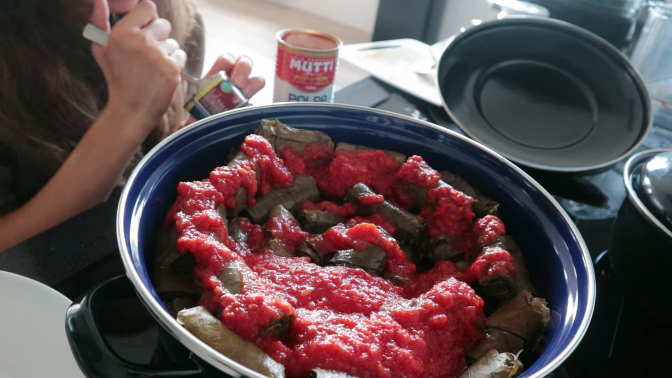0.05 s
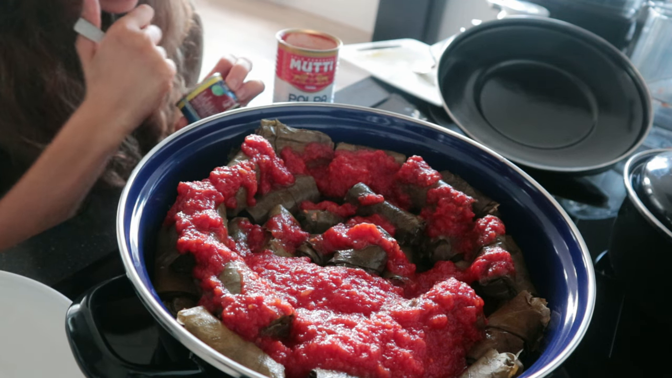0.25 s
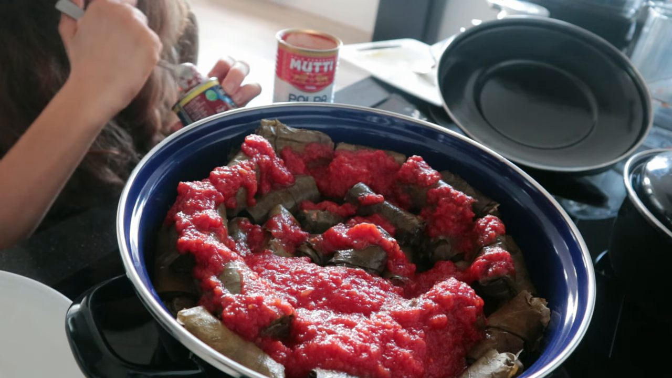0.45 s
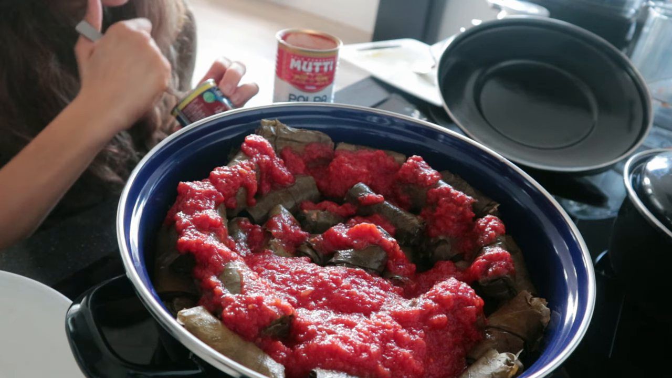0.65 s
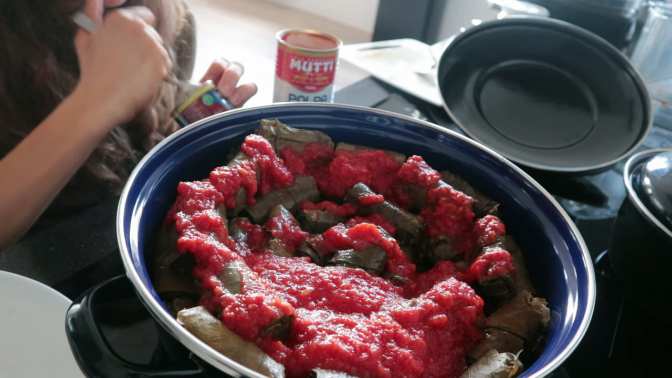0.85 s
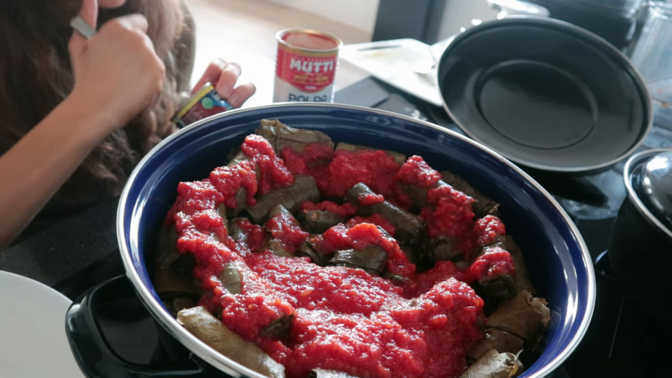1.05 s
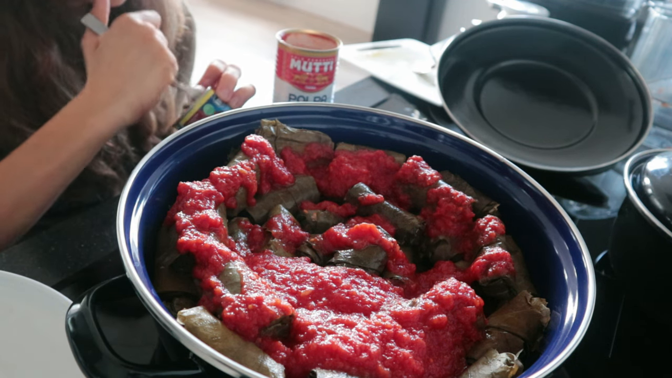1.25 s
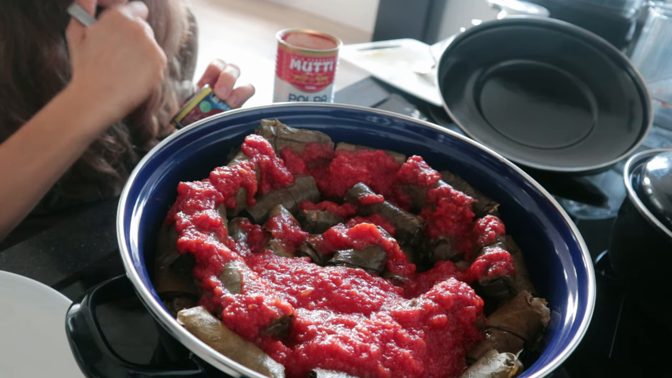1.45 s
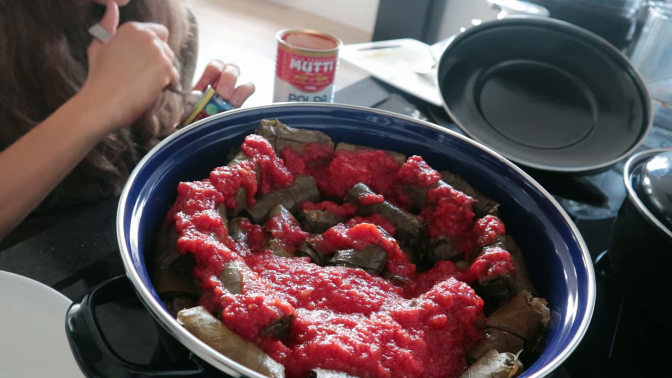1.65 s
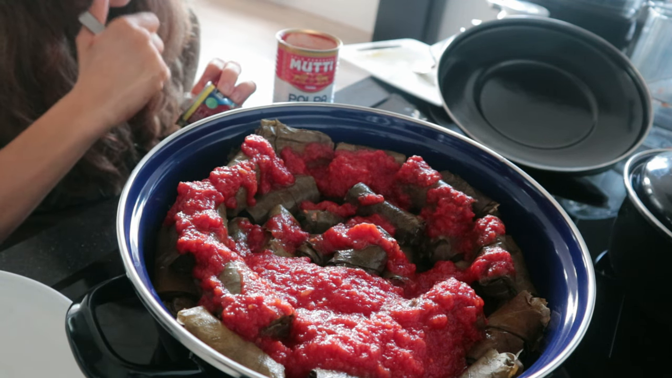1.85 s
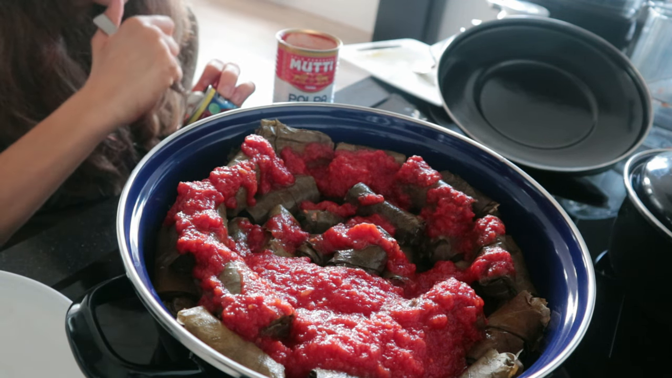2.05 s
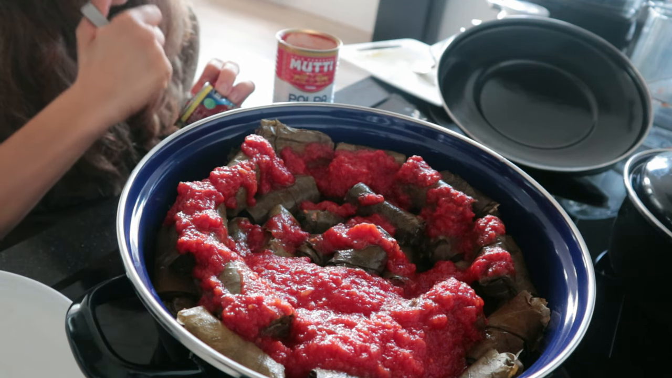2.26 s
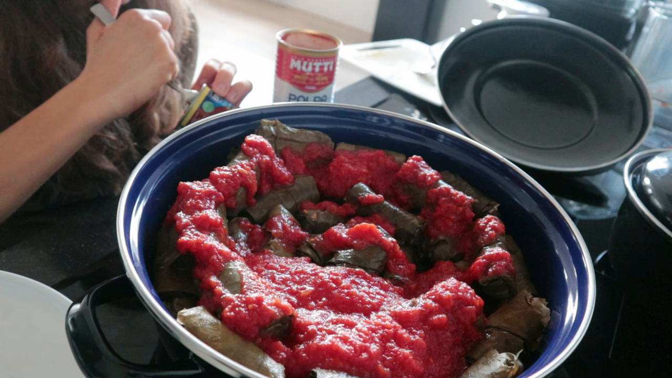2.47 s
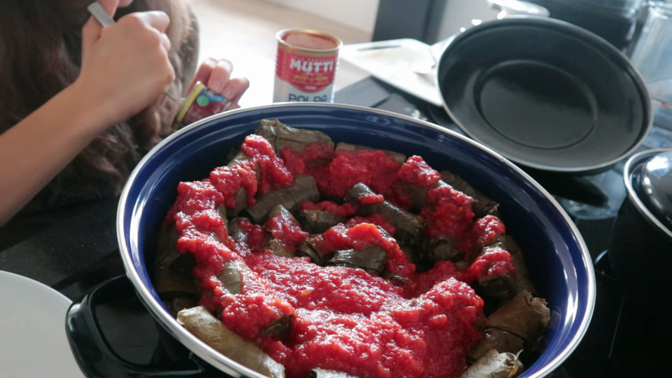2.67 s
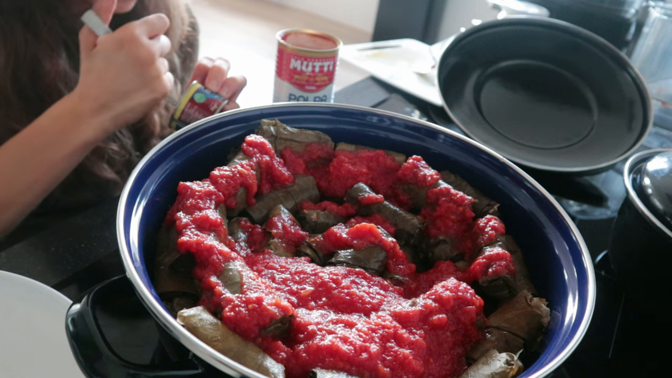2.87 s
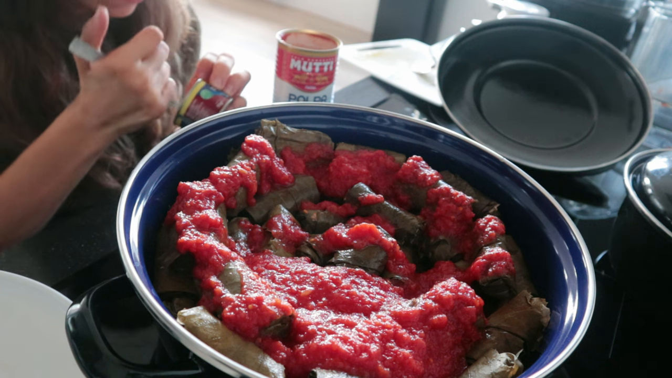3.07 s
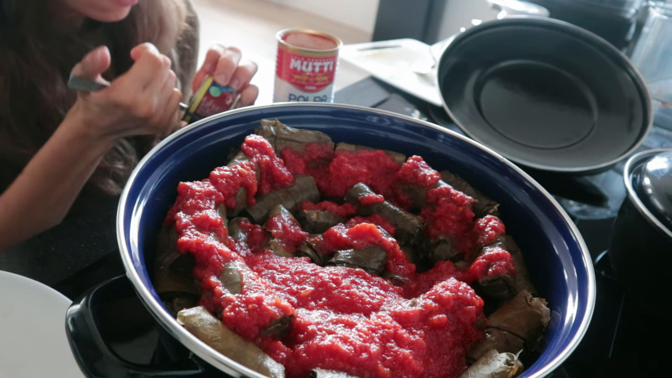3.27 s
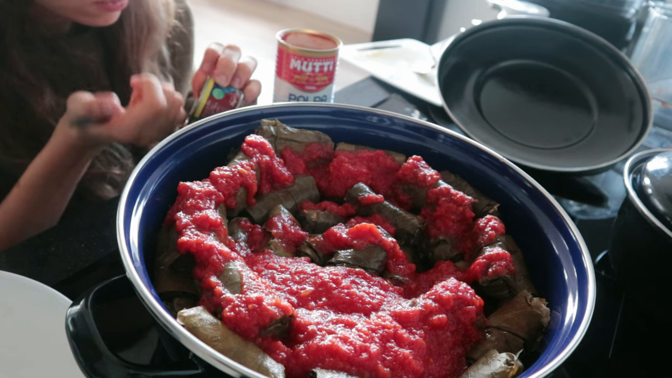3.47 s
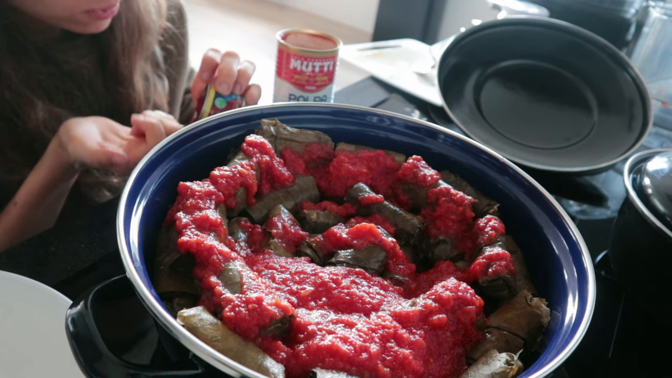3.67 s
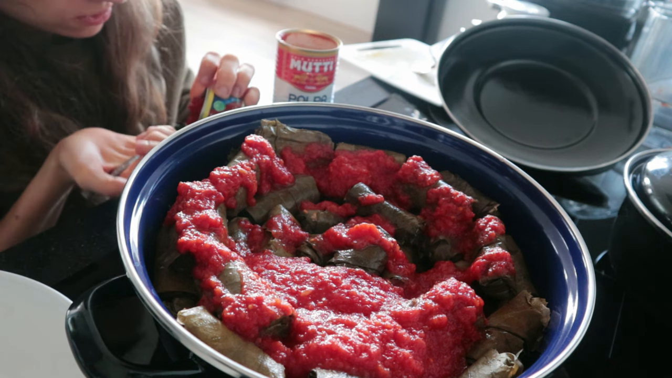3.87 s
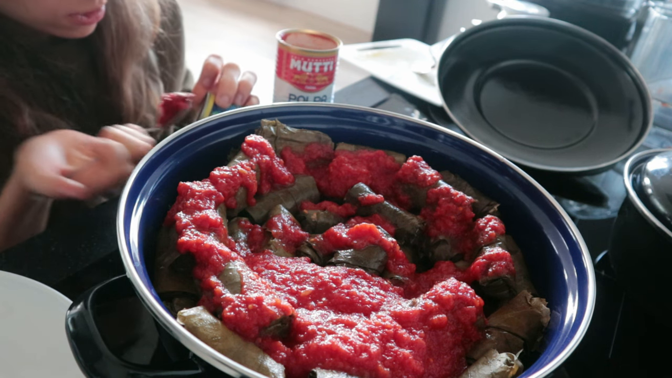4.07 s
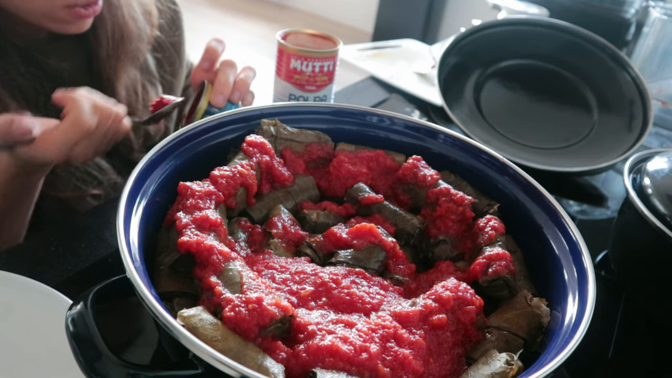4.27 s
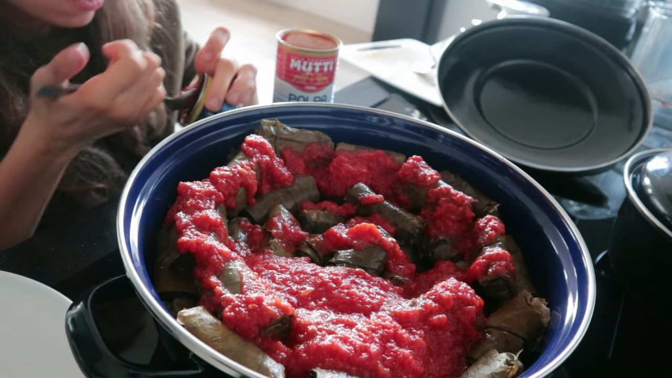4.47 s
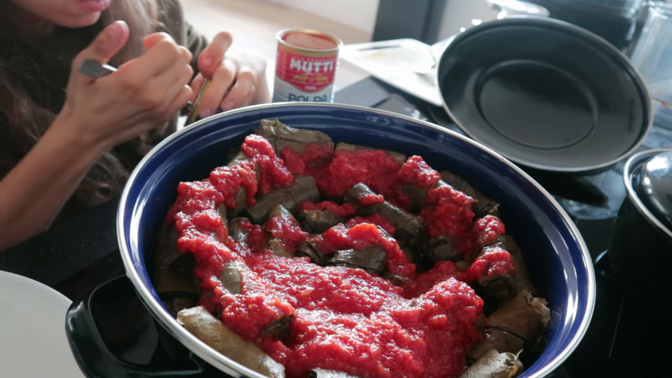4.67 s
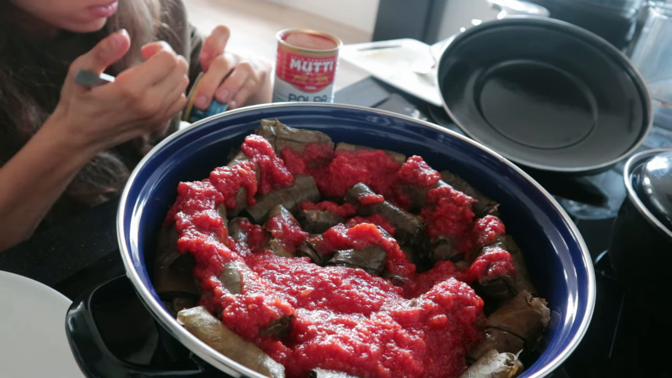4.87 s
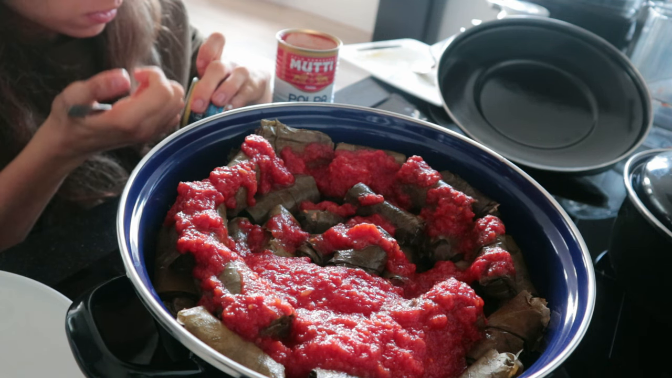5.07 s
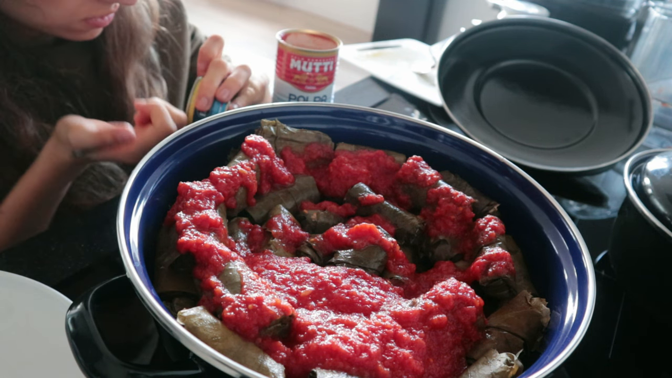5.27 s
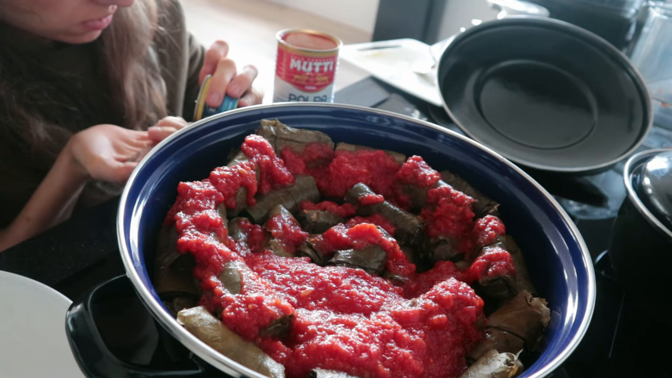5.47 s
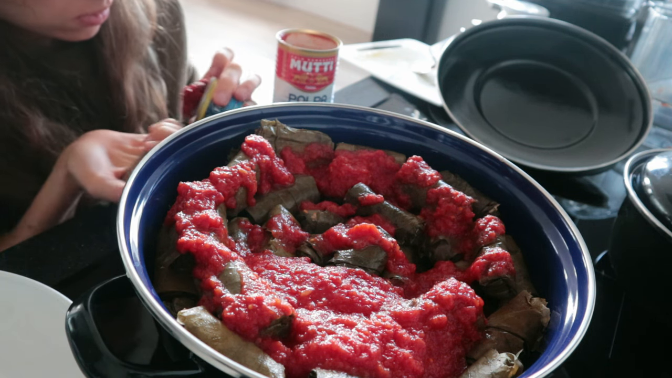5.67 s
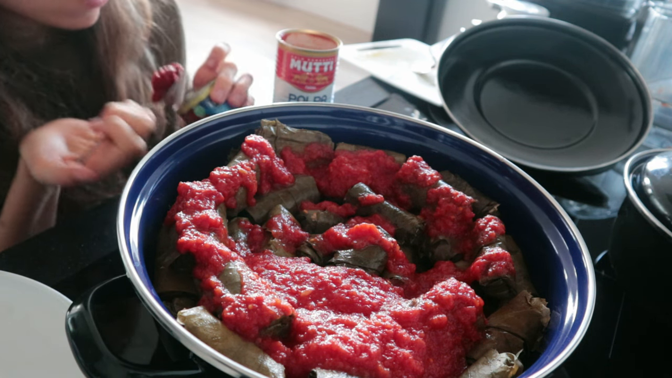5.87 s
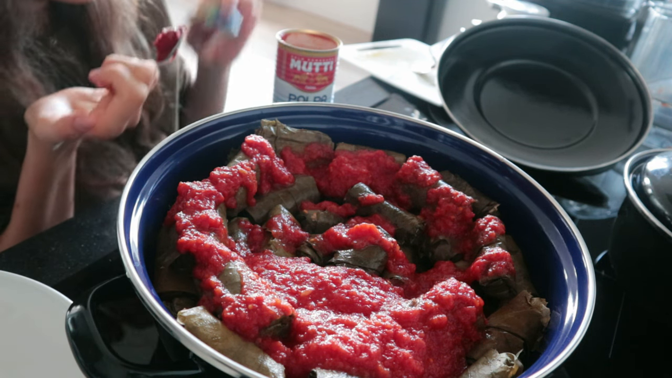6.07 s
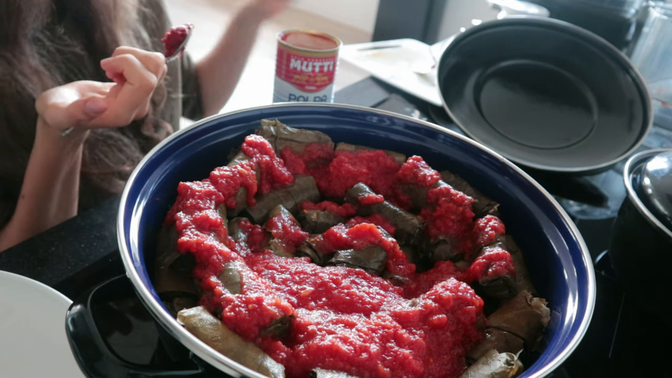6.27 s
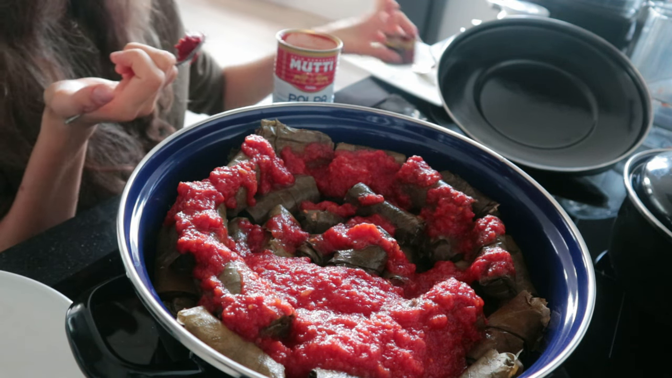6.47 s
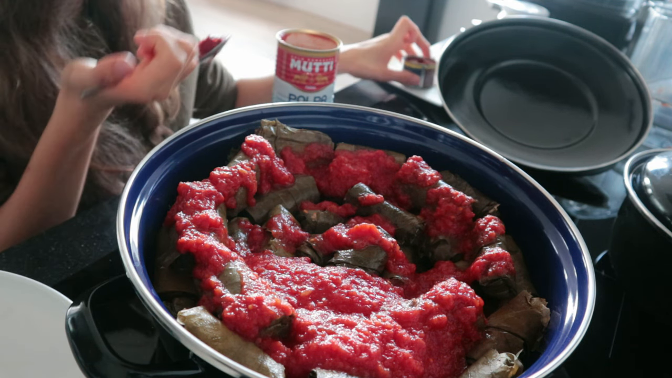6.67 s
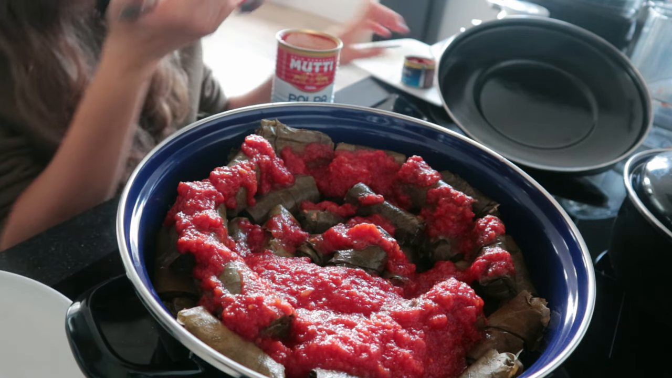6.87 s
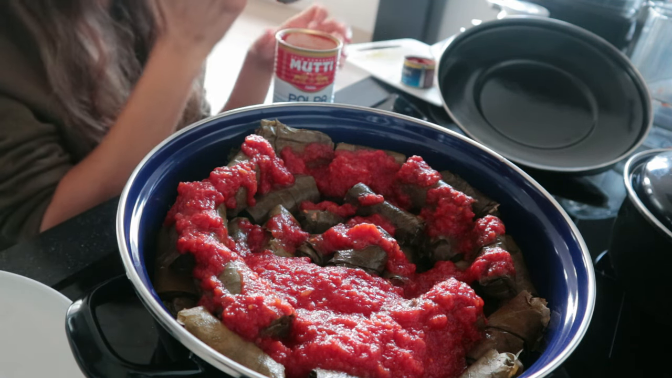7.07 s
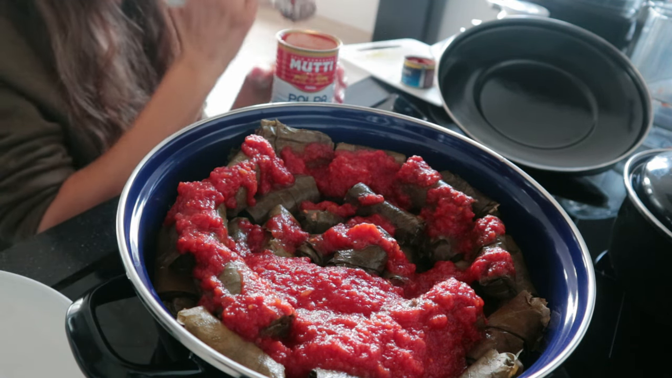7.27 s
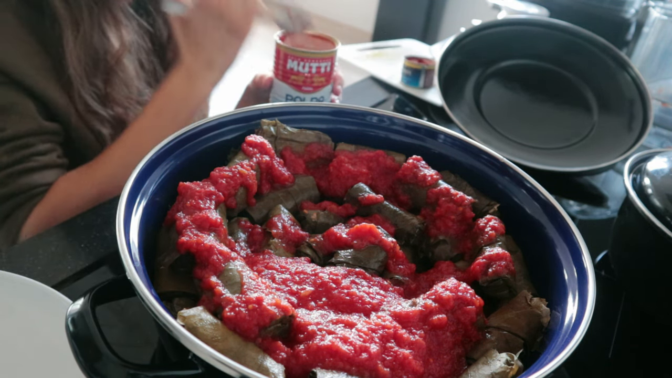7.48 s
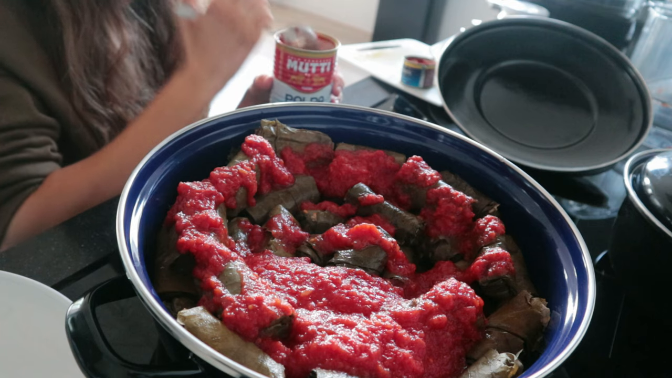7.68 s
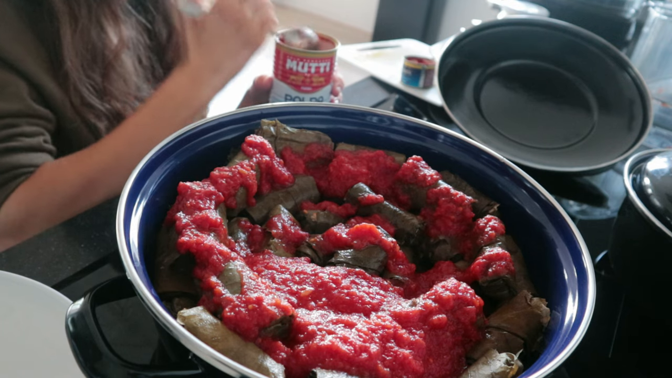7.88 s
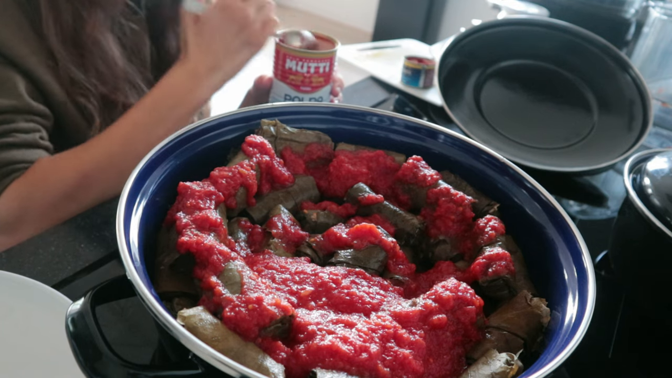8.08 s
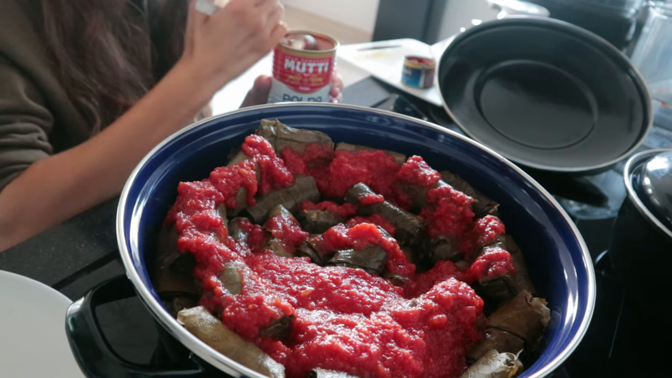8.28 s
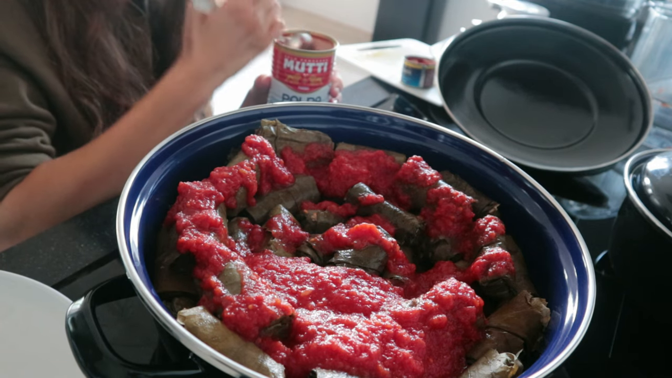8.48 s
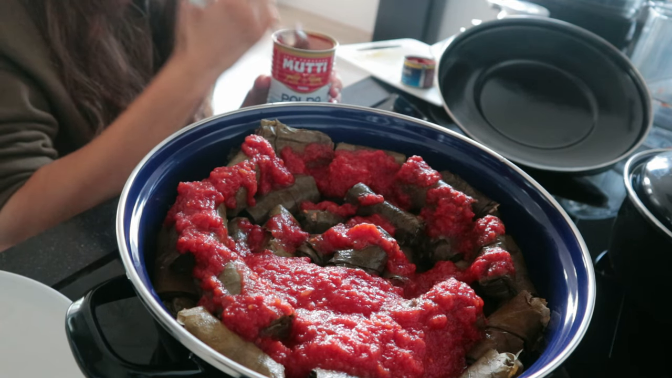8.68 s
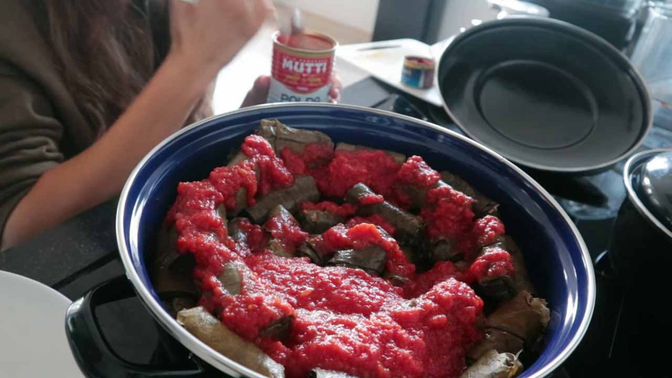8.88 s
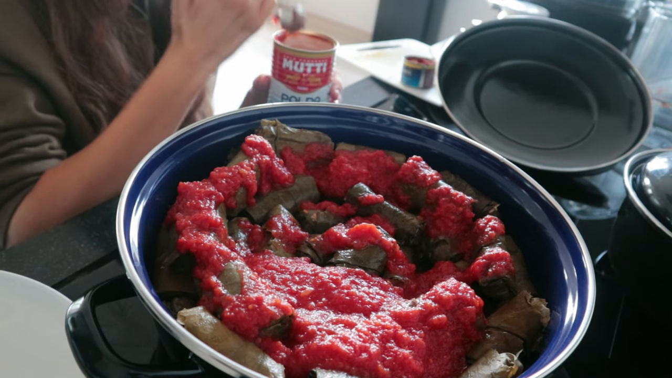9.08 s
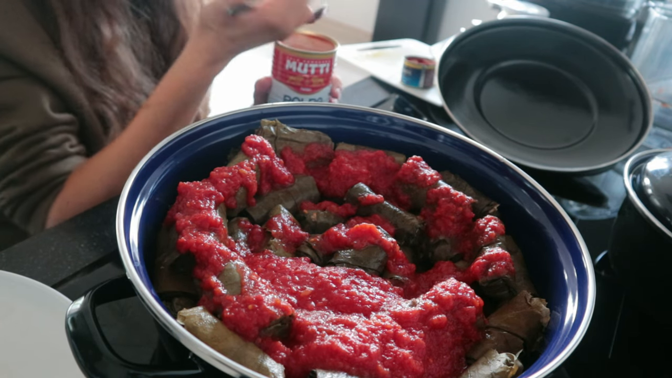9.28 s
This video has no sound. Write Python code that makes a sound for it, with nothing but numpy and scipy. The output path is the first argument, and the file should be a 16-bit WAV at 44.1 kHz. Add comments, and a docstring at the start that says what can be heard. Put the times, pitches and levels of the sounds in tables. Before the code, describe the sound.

In a quiet, humming kitchen, light spoon ticks and scrapes in a little tin lead to one broad clack and ten ringing knocks on a can.

```python
"""A steel spoon taps and scrapes inside a small tin of paste: brief contacts ring the tin's modes,
jerky friction noise rubs them. The whole base of the tin lands on the counter in one broad clack.
Then the spoon is knocked clean on the rim of a larger can, which rings, rocks, thuds and wobbles.
Dense echoes from hard walls surround the blows; the quiet kitchen is resonant hum, air noise and hiss."""
import sys
import numpy as np
from scipy import signal
from scipy.fft import rfft, irfft, next_fast_len
from scipy.io import wavfile

SR = 44100
rng = np.random.default_rng(int(sys.argv[2]) if len(sys.argv) > 2 else 0)


def store_wav(level_fs):
    """Save 16-bit WAV to argv[1]."""
    pcm = np.round(np.clip(np.atleast_2d(level_fs), -1, 1) * 32767)
    wavfile.write(sys.argv[1], SR, pcm.T.astype(np.int16))


N = 411453

# modes of the small tin: (frequency [Hz], relative level [dB], ring time t60 [s])
TIN_MODES = [(675, 5, 0.026), (727, 1.5, 0.065), (788, 7.5, 0.025), (866, 3.5, 0.037), (901, 4.5, 0.027),
             (1228, 0, 0.033), (1306, 0, 0.043), (1381, 5.5, 0.03), (1530, 3, 0.035), (1643, 9, 0.021),
             (1800, 6, 0.026), (1978, 7.5, 0.033), (2075, 4, 0.025), (2202, 3, 0.045), (2317, -5, 0.026),
             (2517, 2.5, 0.025), (2690, 1.5, 0.025), (3035, 8, 0.013), (3328, 5.5, 0.031), (3540, 9, 0.019),
             (3910, 4.5, 0.019), (4230, 5.5, 0.016), (4785, 7.5, 0.013), (5320, 6, 0.02),
             (6210, 1.5, 0.015), (7000, 0, 0.0072), (8560, 8, 0.0086)]
LOW_HZ, TICK_HZ = 1050, 5000  # the tin's boom lies below, its tick and grit above
SHORT = 4096  # samples in a brief burst
BEND, BEND_S = 0.019, 0.022  # modes slide as the wall relaxes: largest share of pitch, time constant


def gain_of(db):
    """Decibels to an amplitude factor."""
    return 10 ** (np.asarray(db) / 20)


def evened(x):
    """Scales to rms 1."""
    return x / np.sqrt(np.mean(x ** 2) + 1e-20)


def read(points, hz):
    """Reads a curve of (frequency, value) points on a log-frequency axis."""
    f, value = np.transpose(points)
    return np.interp(np.log(hz + 1), np.log(f + 1), value)


def add(mix, s, sound):
    """Mixes a sound in at s seconds."""
    part = mix[..., max(round(s * SR), 0):][..., :sound.shape[-1]]
    part += sound[..., :part.shape[-1]]


def coloured(points, size=N):
    """Steady noise of rms 1 with a given spectrum."""
    fast = next_fast_len(size, True)
    colour = gain_of(read(points, np.fft.rfftfreq(fast, 1 / SR)))
    spectrum = rfft(rng.standard_normal(fast)) * colour
    return evened(irfft(spectrum, fast)[:size])


def resonate(x, hz, width):
    """A one-pole complex resonance, width in Hz, with a gain near 1 at its centre."""
    r = np.exp(-np.pi * width / SR)
    return 2 * signal.lfilter([1 - r], [1, -r * np.exp(2j * np.pi * hz / SR)], x).real


def strike(modes, weight_db, contact_ms, chance=1., bend=0.):
    """Modes swell with the contact and die away, varying more with more chance; peak 1."""
    hz, db, t60 = np.transpose(modes)[:, :, None]
    t = np.arange(SHORT) / SR
    luck_db = 2.5 * chance * rng.standard_normal(hz.shape)
    phase = rng.random(hz.shape)
    # pitch bends mostly upwards; this is its integral over time
    slide = bend * rng.uniform(-0.44, 1, hz.shape) * (t - BEND_S * (1 - np.exp(-t / BEND_S)))
    db = db + np.reshape(weight_db, (-1, 1)) + luck_db
    decay = gain_of(db - 60 * t / t60)
    ring = (decay * np.sin(2 * np.pi * (hz * (t + slide) + phase))).sum(0)
    swell = 1 - np.exp(-t * 1000 / max(contact_ms, .05))
    fade_out = np.minimum((SHORT / SR - t) / .03, 1)
    sound = ring * swell * fade_out
    return sound / abs(sound).max()


def burst(points, envelope):
    """A short noise under an envelope, held to a smooth colour, as strong in rms as the envelope."""
    noise = rng.standard_normal(SHORT) * envelope
    colour = gain_of(read(points, np.fft.rfftfreq(SHORT, 1 / SR)))
    gate = np.minimum(envelope / (.1 * envelope.max()), 1)
    for _ in range(3):  # alternately impose the colour and the shape in time
        z = rfft(noise)
        noise = irfft(z / (abs(z) + 1e-12) * colour, SHORT) * gate
    return evened(noise) * np.sqrt(np.mean(envelope ** 2))


def placed(sound, pan_db, lead):
    """Mid and side: pan_db is left over right, and the left is earlier by 2 x lead samples."""
    side = np.tanh(pan_db * np.log(10) / 40) * sound + lead * np.gradient(sound)
    return np.array([sound, side])


def kitchen():
    """Appliance rumble lifted by room resonances, over air noise and a wide microphone hiss."""
    # room resonances: (frequency [Hz], width [Hz], level [dB])
    hum_bands = [(75.1, 12.5, -57), (94, 6, -52.5), (163.4, 6.8, -53.5), (220.2, 18.6, -65.5),
                 (260, 18, -68), (415.5, 11, -71.5)]
    # air noise in the middle: (frequency [Hz], relative density [dB per Hz])
    air_colour = [(12, -52), (20, -18), (37, -9), (81, 1.5), (127, -7), (168, -0.5), (210, -12),
                  (357, -18.5), (410, -20.5), (513, -20.5), (1660, -25.5), (7730, -39.5), (11800, -48.5),
                  (13200, -74), (16000, -80)]
    # hiss in the side channel: (frequency [Hz], relative density [dB per Hz])
    hiss_colour = [(12, -60), (20, -34), (158, -7.5), (285, -2), (319, -6), (399, -2), (485, -7), (527, -5),
                   (897, -6.5), (1810, -9.5), (3840, -13.5), (12400, -28.5), (16000, -62)]
    air_db, hiss_db = -57, -62.5  # rms levels
    noise = rng.standard_normal(N)
    hum = np.zeros(N)
    for f, width, db in hum_bands:
        hum += gain_of(db) * evened(resonate(resonate(noise, f, width), f, 3 * width))
    mid = hum + gain_of(air_db) * coloured(air_colour)
    return np.array([mid, gain_of(hiss_db) * coloured(hiss_colour)])


def taps():
    """Each spot struck frees a middle and a high mode; the others weaken with distance in pitch."""
    # spoon on the small tin: (time [s], level of the ring [dB], favoured middle pitch [Hz],
    # favoured high pitch [Hz], low modes over middle [dB], high modes over middle [dB],
    # ring time t60 of the favoured middle mode [ms], ring time t60 of the favoured high mode [ms])
    tap_list = [(0.002, -27.5, 2010, 2237, -22, 4, 23, 31), (0.106, -38.5, 1970, 3180, -27, -7, 33, 26),
                (0.203, -47, 1800, 3500, -14, 2, 30, 28), (0.564, -43.5, 1870, 2425, -17, 6, 30, 23),
                (0.65, -44, 1300, 3560, -11, 12, 30, 25), (0.666, -38.5, 1994, 4200, -1, -2, 34, 25),
                (0.9012, -38, 2000, 3520, -15, 0, 15, 15), (0.91, -23.5, 1340, 2370, -8, 4.5, 40, 41),
                (0.98, -28, 1800, 3500, -8.5, -6.5, 22, 23), (0.984, -28.5, 1336, 2220, -14, -13, 30, 25),
                (1.0485, -44, 1500, 2300, -18, -4, 30, 30), (1.235, -40, 1650, 3020, -8, 1, 25, 15),
                (1.267, -24, 1346, 2450, -8, 4.5, 43, 28), (1.2685, -34, 1400, 3740, -16, 8, 30, 28),
                (1.3555, -38, 1900, 3580, -12, 1, 16, 26), (1.3585, -32.5, 1200, 2210, -12, -3, 22, 38),
                (1.365, -40.5, 1240, 2170, -12, 6, 27, 46), (1.573, -39.5, 1920, 3630, -9, -6, 20, 17),
                (1.648, -27, 1300, 2290, -4.5, 1.5, 25, 25), (1.6515, -29.5, 1220, 2020, -4, -1, 30, 30),
                (1.659, -34, 1950, 2310, -7.5, -2, 44, 25), (1.738, -44, 1450, 2420, -12, 2, 28, 28),
                (1.778, -41, 1550, 2730, -12, 3, 40, 30), (2.024, -38.5, 1800, 3520, -9, -1, 20, 15),
                (2.032, -42, 1360, 2400, -15, -6, 45, 28), (2.06, -28, 1930, 3835, 7.5, 0.5, 27, 84),
                (2.0605, -31, 1590, 2670, -12, 8, 27, 35), (2.07, -39, 2100, 4030, -10, 5, 25, 60),
                (2.08, -39, 1930, 3930, -14, 2, 26, 43), (2.183, -33, 2000, 2270, -7, 0.5, 30, 17),
                (2.196, -39, 2030, 3300, -6, -3, 37, 20), (2.408, -45, 1630, 3500, -12, -4, 35, 15),
                (2.455, -26, 1775, 2590, -1.5, 0.5, 63, 33), (2.611, -40, 1350, 2770, -10, 6, 30, 36),
                (2.617, -40, 1500, 4270, -10, 7, 20, 22), (2.64, -43, 1600, 2750, -3, -2, 34, 25),
                (2.673, -42.5, 1340, 3350, 10, -4, 30, 25), (3.652, -47.5, 1960, 2980, -6, 4, 30, 20),
                (3.667, -42.5, 1800, 3000, -8, 4, 30, 22), (3.734, -44, 1680, 2690, -6, -9, 25, 30),
                (3.812, -49, 1430, 2700, -6, -5, 30, 30), (4.558, -33.5, 1289, 4080, -14, -6, 140, 38),
                (4.559, -41, 1900, 2910, -17, -6, 34, 25), (4.643, -45, 1320, 3120, -16, -14, 40, 25),
                (4.7, -41.5, 1800, 2540, 5, -8, 25, 25), (4.718, -45, 2040, 2450, -6, 0, 30, 43),
                (4.7445, -37.5, 1300, 3430, 6, -12, 29, 23), (4.903, -43.5, 1800, 3080, -16, -14, 30, 20),
                (4.956, -49, 1670, 3680, -6, -8, 30, 20), (4.982, -46, 1630, 2210, -6, -10, 30, 20),
                (5.027, -40, 1700, 3450, -2, -12, 33, 25), (5.058, -45.5, 1610, 3100, -3, -11, 30, 20),
                (5.131, -33.5, 1680, 3440, -14, -10, 30, 20), (5.137, -31, 1630, 2720, -10, -10, 40, 25),
                (5.151, -36.5, 2050, 3500, 3, -8, 25, 20), (5.194, -41, 1630, 3570, -10, 0, 30, 23),
                (5.217, -31.5, 1680, 3350, -8, 0, 29, 20), (5.238, -35, 1510, 2370, -11, -4, 30, 20),
                (5.253, -36, 1890, 3500, -4, -6, 30, 20), (5.264, -37, 1650, 2300, -10, -8, 33, 20),
                (5.282, -41, 1670, 3400, -8, -10, 27, 20), (5.359, -38, 1780, 3600, -6, -9, 35, 25),
                (5.416, -45, 1490, 2550, 0, -8, 30, 25), (5.43, -27.5, 1810, 2450, -10, 1, 23, 18),
                (5.4395, -31.5, 2140, 2480, -7, -11, 32, 20),
                (5.526, -33.5, 1750, 2440, -8.5, -9.5, 30, 25), (5.635, -38.5, 2020, 2280, -6, -10, 34, 30),
                (5.665, -38, 2025, 2240, -9, -5, 32, 30), (7.067, -51, 1300, 2350, 4, -5, 27, 30)]
    # how the tin is held and how bright the spoon is: (time [s], favoured low pitch [Hz],
    # left over right [dB], relative tick level [dB])
    grip = [(0, 675, -2, -20.5), (1, 697, -1, -26), (1.27, 686, -2, -17), (1.6, 687, -2, -25.5),
            (2.03, 693, -1.5, -18), (2.05, 860, -2, -19.5), (3.7, 880, -1.2, -29), (3.8, 715, -1.2, -30),
            (4.6, 724, -1.2, -17), (4.7, 880, -1.2, -26), (4.8, 860, -1.2, -33), (4.9, 724, 1, -19),
            (5.7, 725, .2, -21), (7.1, 890, -2, -28)]
    high_hz_border = 2200  # between middle and high modes
    contact_ms, tick_per_high = 0.96, 0.28  # the tick is louder where the high modes are
    free_db = 5  # strength of a favoured mode
    twin_gap, twin_db = 0.041, -5  # its close twin: share of pitch above, level under it
    out = np.zeros((2, N))
    hz = np.transpose(TIN_MODES)[0]
    group = np.digitize(hz, [LOW_HZ, high_hz_border, TICK_HZ])
    when, held_hz, held_pan, held_db = np.transpose(grip)
    tick_fade_db = -60 * np.arange(SHORT) / SR / 0.049
    for s, db, mid_hz, high_hz, low_db, high_db, mid_ms, high_ms in tap_list:
        tick_db = np.interp(s, when, held_db) + tick_per_high * high_db
        modes, twins = np.array(TIN_MODES), []
        for spot_hz, ring_ms in [(mid_hz, mid_ms), (high_hz, high_ms)]:
            t60 = max(ring_ms, 5) / 1000
            modes[np.argmin(abs(hz - spot_hz))] = spot_hz, free_db, t60  # retunes the nearest mode
            twins.append((spot_hz * (1 + twin_gap), free_db + twin_db, t60))
        favoured_hz = np.array([np.interp(s, when, held_hz), mid_hz, high_hz, 6000])
        octaves_away = abs(np.log2(modes[:, 0] / favoured_hz[group]))
        group_db = np.array([low_db, 0, high_db, tick_db + 10])
        weight_db = group_db[group] - np.minimum(50 * octaves_away, 13)
        sound = strike([*modes, *twins], [*weight_db, 0, high_db], contact_ms, chance=.5, bend=BEND)
        tick = evened(resonate(resonate(rng.standard_normal(SHORT), 4000, 7300), 6000, 14000))
        sound += tick * gain_of(tick_db - 3.0 + tick_fade_db)
        add(out, s, gain_of(db) * placed(sound, np.interp(s, when, held_pan), lead=1.0))
    return out


def scraping():
    """The spoon edge slips in uneven little jerks, and every jerk rings the tin."""
    # strokes of the spoon edge: (start [s], rise [s], hold [s], release [s], relative pressure [dB],
    # pitch favoured by the spot rubbed [Hz], relative wall boom [dB], relative grit [dB])
    stroke_list = [(0.011, .002, 0.11, 0.17, -57, 2020, -28, -31),
                   (0.558, 0.0069, 0.01, 0.039, -59, 1930, -30, -8),
                   (0.656, 0.011, 0.012, 0.034, -51.5, 2000, -13, -18),
                   (0.904, 0.0018, 0.0044, 0.0027, -52, 2300, -8, -21),
                   (1.7, 0.043, 0.066, 0.069, -49, 1560, -19, -20),
                   (2.59, 0.021, .03, 0.083, -50, 2780, -12.5, -14.5),
                   (3.643, 0.026, 0.029, 0.033, -53, 3050, -14, -23),
                   (3.703, 0.026, .012, .04, -54.5, 1600, -15, -25),
                   (3.778, 0.035, 0.017, 0.072, -57, 1600, -11, -24),
                   (3.867, 0.025, 0.08, .035, -54, 1890, -8.5, -23),
                   (4.564, .002, .004, 0.056, -46, 1350, -15, -21),
                   (4.634, 0.0095, .003, 0.029, -53, 1400, -22, -17),
                   (4.692, 0.035, 0.019, 0.028, -55, 2290, -5, -22),
                   (4.9, .002, 0.0045, 0.086, -56, 1740, -12, -27),
                   (4.962, 0.032, 0.051, 0.048, -55, 1690, -0.5, -23),
                   (5.119, 0.015, 0.016, 0.034, -44, 1730, -3.5, -23),
                   (5.182, 0.019, 0.05, 0.054, -45.5, 1740, -2.5, -20.5),
                   (5.341, 0.018, 0.0027, 0.03, -50.5, 1740, -10, -22),
                   (5.406, 0.024, 0.01, 0.069, -43, 2020, -7, -20.5),
                   (5.519, 0.0057, 0.0034, 0.11, -47.5, 1780, -6, -22),
                   (5.62, 0.027, 0.034, 0.075, -49, 2030, -7.5, -18.5),
                   (7.332, .012, 0.035, .004, -51.5, 1800, 0.5, -27)]
    start_db, end_db = -15.5, -22  # a stroke fades in from one and out to the other
    boom_follows = 0.4  # share of the fade that the boom follows
    jerks_per_s = 800
    out = np.zeros(N)
    hz = np.transpose(TIN_MODES)[0]
    body = (hz > LOW_HZ) & (hz < TICK_HZ)
    body_hz = hz[body, None]
    soft = signal.butter(2, 4300, fs=SR, output="sos")  # low-passes the stroke's body
    for s, *parts, pressure_db, spot_hz, boom_db, grit_db in stroke_list:
        bends = np.cumsum([0, *np.maximum(parts, .001)])
        t = np.arange(0, bends[-1], 1 / SR)
        fade_db = np.interp(t, bends, [start_db, 0, 0, end_db])
        jerk_size = gain_of(2.9 * np.minimum(rng.exponential(1, len(t)), 3.5))
        jerks = jerk_size * (rng.random(len(t)) < jerks_per_s / SR)
        slip = rng.standard_normal(len(t)) * (jerks + 0.21)  # jerks over a steady rub
        wall = np.array([gain_of(db + 1.6 * rng.standard_normal()) * resonate(slip, f, 3.6 / t60)
                         for f, db, t60 in TIN_MODES])
        spot = gain_of(-np.minimum(30 * abs(np.log2(body_hz / spot_hz)), 9))
        rub = (1500 / body_hz) ** 0.33  # rubbing drives high modes less
        stroke = evened((wall[body] * rub * spot).sum(0))
        stroke = evened(signal.sosfilt(soft, stroke))
        boom = resonate(wall[hz < LOW_HZ].sum(0), 728, 40)  # the wall's breathing mode stands out
        rasp = evened(resonate(resonate(slip, 5200, 7100), 5300, 9000))
        grit = 0.43 * evened(wall[hz > TICK_HZ].sum(0)) + 1.4 * rasp
        grit = resonate(grit, 7100, 11000)  # a broad resonance softens the grit's top
        stroke += gain_of(boom_db - (1 - boom_follows) * fade_db) * evened(boom)
        stroke += gain_of(grit_db + 9.0) * evened(grit)
        stroke *= signal.windows.tukey(len(t), .08)
        add(out, s, gain_of(fade_db + pressure_db - 3.5) * stroke)
    return placed(out, -0.86, lead=1.0)


def set_down():
    """The whole base lands at once: the tin's modes and a broad clack swell over the contact."""
    # the tin meets the counter: (time [s], peak level [dB], contact [ms], left over right [dB])
    landing = (6.6925, -11.5, 3.5, -4)
    # colour of the clack: (frequency [Hz], relative density [dB per Hz])
    clack_colour = [(200, -30), (630, -14), (774, -6), (860, -11), (967, -22), (1170, -2), (1320, -8.5),
                    (1430, -7), (1560, -13.5), (1670, -5), (1820, -6.5), (2020, 1.5), (2250, -7.5),
                    (2480, -11), (2660, -2), (2850, -12), (3100, -6), (3440, -15), (4000, -14),
                    (4840, -15.5), (5460, -24), (7300, -34.5), (10500, -40), (16000, -80)]
    resting = 0.7  # share of the ring time left once the tin stands on the counter
    out = np.zeros(N)
    s, db, contact_ms, pan_db = landing
    u = np.arange(SHORT) / SR * 1000 / contact_ms  # time in contacts
    hz, mode_db, _ = np.transpose(TIN_MODES)
    clack = burst(clack_colour, u * np.exp(-u ** 1.4))
    weight_db = 1.1 * read(clack_colour, hz) - mode_db  # the clack's colour replaces the mode levels
    ring = strike(np.multiply(TIN_MODES, [1, 1, resting]), weight_db, contact_ms, chance=.3)
    sound = 1.9 * clack / abs(clack).max() + ring
    add(out, s, gain_of(db) * sound / abs(sound).max())
    return placed(out, pan_db, lead=0.62)


def blow(tilt_db, contact_ms, belly_db, spots_hz):
    """Clear modes of the can over a short clatter; both go out to the walls in another mix."""
    # modes of the large can: (frequency [Hz], relative level [dB], ring time t60 [s])
    can_modes = [(700, -6, 0.096), (945, -6, 0.04), (1074, -6.5, 0.037), (1290, -7.5, 0.035),
                 (1500, -6.5, 0.042), (1813, -7.5, 0.034), (1990, -3.5, 0.04), (2185, -5.5, 0.041),
                 (2340, -8, 0.052), (2493, -6, 0.058), (2650, -7, 0.041), (2790, -14, 0.03),
                 (3270, 0.5, 0.039), (3550, -2.5, 0.03), (3970, -5, 0.019), (4250, -2, 0.015),
                 (4450, -4, 0.02), (4814, -2.5, 0.029), (5020, 0, 0.024), (5826, -5, 0.026),
                 (6060, -5, 0.026), (6800, -22, 0.0072), (7220, -5, .01), (7480, -10.5, 0.014),
                 (8540, 1.5, 0.01), (9500, -12, 0.0039), (11060, -6.5, 0.0066), (12900, -13, .004)]
    # the can's many faint modes: (frequency [Hz], relative density [dB per Hz])
    clatter_colour = [(180, -44), (300, -9.5), (520, -17), (680, -3), (850, -16), (1200, -11), (1970, -9),
                      (3520, -9.5), (4990, -11), (6410, -20), (8500, -23.5), (10000, -29), (12700, -30),
                      (16500, -54)]
    spot_lift_db, spot_octaves = 6.5, 0.058  # lift of modes near a favoured pitch, and its reach
    t = np.arange(SHORT) / SR
    hz = np.transpose(can_modes)[0]
    octaves_away = np.log2(hz[:, None] / spots_hz)
    spot_db = spot_lift_db * np.exp(-(octaves_away / spot_octaves) ** 2).sum(1)
    weight_db = tilt_db * np.log2(hz / 2000) + belly_db * (hz == hz.min()) + spot_db
    sound = strike(can_modes, weight_db, contact_ms, chance=.6, bend=BEND / 3)
    swell = 1 - np.exp(-t * 1000 / max(contact_ms, .05))
    clatter = burst(clatter_colour, swell * gain_of(-5.5 + 1.4 * tilt_db - 60 * t / 0.035))
    return np.array([sound + clatter, 0.88 * sound + 1.216 * clatter])


def counter_thud():
    """The counter, pushed once, rings its low modes and a low room resonance under a soft onset; peak 1."""
    # low modes of the counter, led by a room resonance near 100 Hz that each push also rings: (frequency [Hz],
    # relative level [dB], ring time t60 [s])
    counter_modes = [(98.6, -19, 0.31), (230, -6.5, 0.057), (262, -5, 0.044), (312, 3, .03),
                     (412.7, -3, 0.042)]
    t = np.arange(SHORT) / SR
    hz, db, t60 = np.transpose(counter_modes)[:, :, None]
    ring = (gain_of(db - 60 * t / t60) * np.sin(2 * np.pi * hz * t)).sum(0)
    thud = ring * (1 - np.exp(-t / 0.0024))
    return thud / abs(thud).max()


def wobble():
    """A low hum that climbs while the can settles on its base and ends when it sits flat."""
    start_hz, climb_hz_per_s, length_s = 146.2, 840, 0.11
    t = np.arange(0, length_s, 1 / SR)
    shape = np.clip(t / .025, 0, 1) * np.clip((length_s - t) / 0.011, 0, 1)
    return shape * np.sin(2 * np.pi * (start_hz * t + climb_hz_per_s * t ** 2 / 2 + rng.random()))


def knocks():
    """Rim blows ring the can; each blow and landing pushes the counter, each landing clacks the wall."""
    # spoon on the can's rim: (time [s], relative blow level [dB], clack of the first landing [dB],
    # delay of the second landing [ms], its thud [dB], lowest can mode [dB], wobble [dB],
    # first pitch favoured by the spot struck [Hz], second favoured pitch [Hz])
    knock_list = [(7.3875, -8, -17, 14.7, -26, 6, -36.5, 1990, 1500),
                  (7.579, -7, -19, 21.5, -30, -12, -34.5, 2730, 1960),
                  (7.7528, -7.5, -21, 18.6, -27.5, 0, -35.5, 2000, 1520),
                  (7.9426, -7.5, -18.5, 19, -23, -0.5, -34, 1990, 4800),
                  (8.1353, -8, -21, 14.6, -15.5, -1, -39, 1990, 4730),
                  (8.322, -6.5, -15.5, 17.6, -29, 0.5, -31.5, 945, 5020),
                  (8.5127, -7.5, -13.5, 14.6, -14, -4, -41, 1570, 4420),
                  (8.6916, -6.5, -16, 16, -13.5, -2.5, -38.5, 3160, 2670),
                  (8.8667, -6.5, -9, 15, -20.5, 7, -35.5, 1970, 940),
                  (9.0417, -9.5, -15, 14.5, -25, 1, -36, 2450, 1990),
                  (9.2108, -23, -40, 15, -47, 0, -55, 915, 2650)]
    contact_ms, hard_tilt_db = 0.52, 1  # tilt per octave of a firm blow
    firm_db, soften = -12, 1.2  # weaker blows sound duller: tilt lost per dB under firm_db
    crack_db, push_db = 0.35, -18.5  # crack on the rim, and its push on the counter, over the blow level
    land_ms, thud_db = 8.3, -8  # first landing: delay, thud over the blow level
    reclack_db = -4  # second landing: clack over its thud
    out = np.zeros((2, N))  # towards the microphone, towards the walls
    thud = counter_thud()
    for s, db, clack_db, again_ms, again_db, belly_db, wobble_db, *spots_hz in knock_list:
        add(out[0], s, gain_of(wobble_db) * wobble())
        add(out, s, gain_of(db + push_db) * thud[None])
        tilt_db = hard_tilt_db + soften * min(db - firm_db, 0)
        crack = blow(tilt_db, contact_ms, min(belly_db, 0), spots_hz)
        add(out, s, gain_of(db + crack_db) * crack)
        clack = gain_of(clack_db) * blow(-3.5, 0.49, belly_db, spots_hz)
        add(out, s + land_ms / 1000, gain_of(db + thud_db) * thud + clack)
        reclack = gain_of(reclack_db) * blow(-2.5, 0.55, belly_db, spots_hz)
        add(out, s + again_ms / 1000, gain_of(again_db) * (thud + reclack))
    return placed(out[0], -1.37, lead=0.89), out[1]


def room(x):
    """Dense echoes from hard walls, each band dying at its own speed; mid and side are unrelated."""
    # decay: (frequency [Hz], t60 [s])
    echo_decay = [(150, 0.77), (500, 0.57), (1400, 0.57), (3700, 0.55), (8000, 0.45), (12000, 0.22)]
    # colour: (frequency [Hz], relative level [dB])
    echo_colour = [(150, -1.5), (500, -2), (900, 3.5), (1400, 6), (3700, -0.5), (8000, -1), (12000, -10)]
    # width: (frequency [Hz], side over mid [dB])
    echo_width = [(150, -31), (500, -20), (1400, -12.5), (3700, -5.5), (8000, 5), (12000, 15)]
    hz, t, z = signal.stft(rng.standard_normal((3, 2, SR)), SR, nperseg=256)
    z *= gain_of(read(echo_colour, hz)[:, None] - 60 * t / read(echo_decay, hz)[:, None])
    z[:, 1] *= gain_of(read(echo_width, hz))[:, None]
    tails = signal.istft(z, SR, nperseg=256)[1][..., :SR // 2]
    tails *= np.clip(np.arange(SR // 2) / SR / 0.0029, 0, 1)  # echoes build up
    # three tails take turns, 1.6 rounds a second: the changing echo pattern blurs steady pitches
    turn = np.arange(N) / SR * 1.6
    wet = np.zeros((2, N))
    for k, tail in enumerate(tails):
        share = np.sqrt(2 / 3) * np.cos(2 * np.pi * (turn + k / 3))
        wet += signal.oaconvolve((x * share)[None], tail, axes=1)[:, :N]
    return wet / np.linalg.norm(tails[0, 0])


def scene():
    """Sources, their echoes and the background, turned from mid and side to left and right."""
    tin = taps() + scraping() + set_down()
    can, outward = knocks()
    near = tin + can + room(gain_of(-13.5) * tin[0] + gain_of(-12.0) * outward)
    # the near sounds and their echoes are limited to this band
    reach = signal.butter(2, [120, 13500], "band", fs=SR, output="sos")
    mid, side = signal.sosfilt(reach, near) + kitchen()
    return np.array([mid + side, mid - side])


def record(dry):
    """The input stage softly rounds off peaks, then a steep filter limits the treble."""
    edge_hz, ceiling = 16600, 1
    soft = ceiling * np.tanh(dry / ceiling)
    lowpass = signal.firwin(511, edge_hz, window=("kaiser", 9), fs=SR)
    return signal.oaconvolve(soft, lowpass[None], "same")


dry = scene()
out = record(dry)
store_wav(out)
```